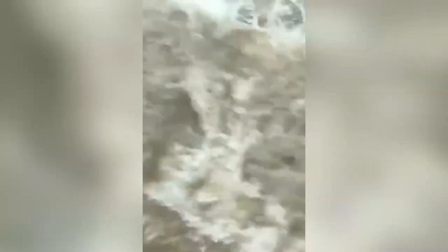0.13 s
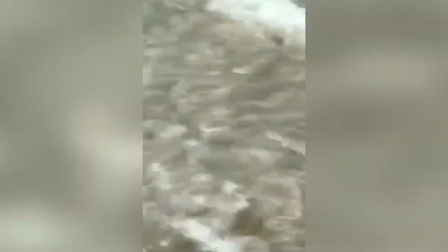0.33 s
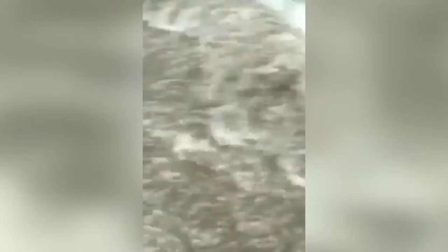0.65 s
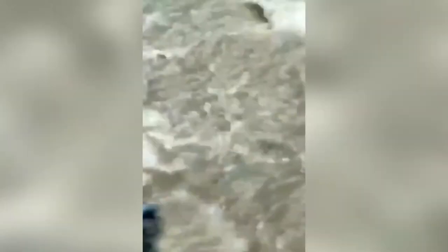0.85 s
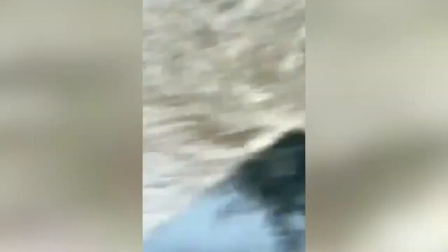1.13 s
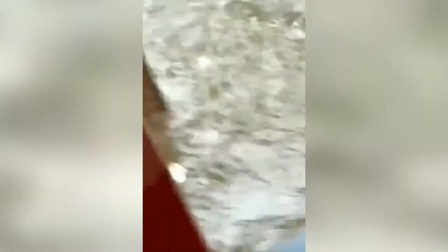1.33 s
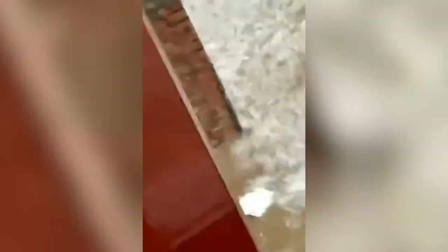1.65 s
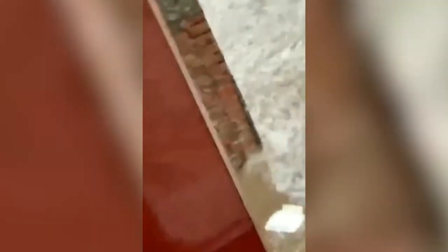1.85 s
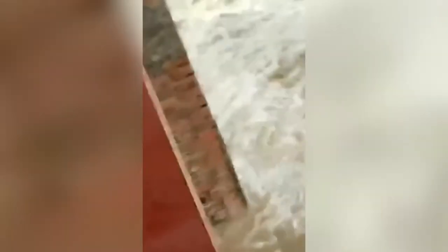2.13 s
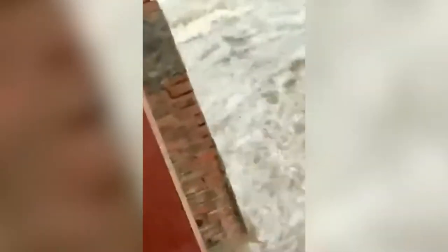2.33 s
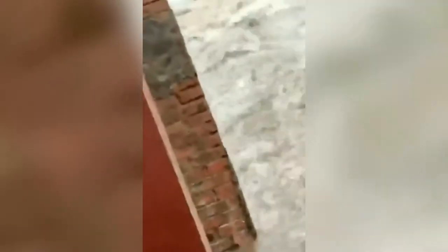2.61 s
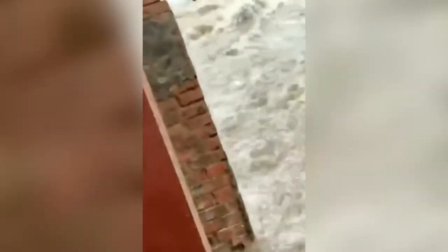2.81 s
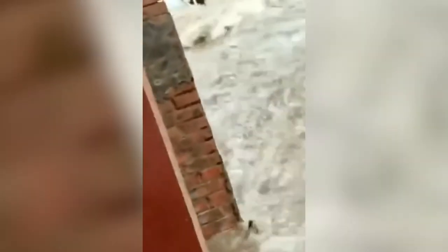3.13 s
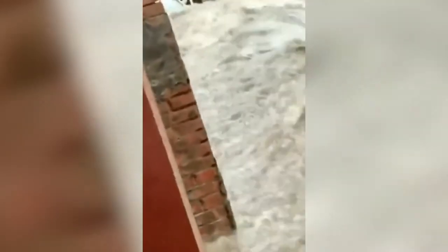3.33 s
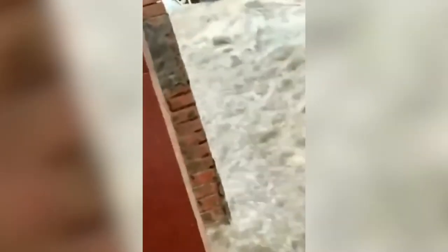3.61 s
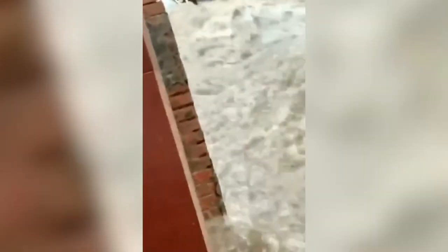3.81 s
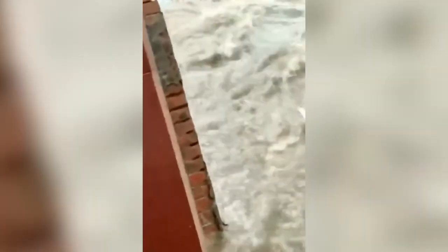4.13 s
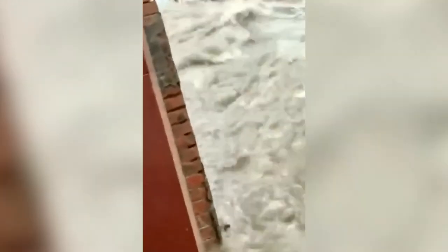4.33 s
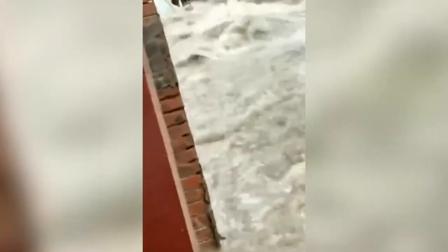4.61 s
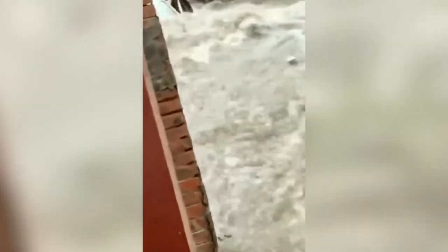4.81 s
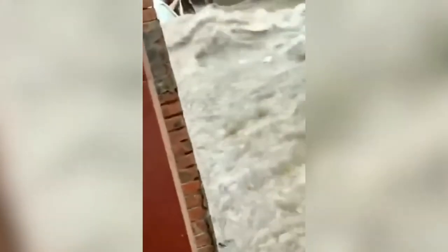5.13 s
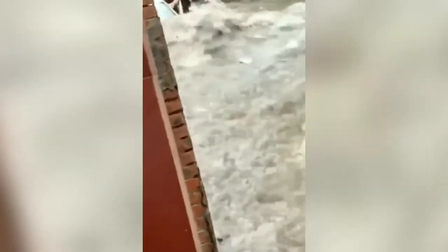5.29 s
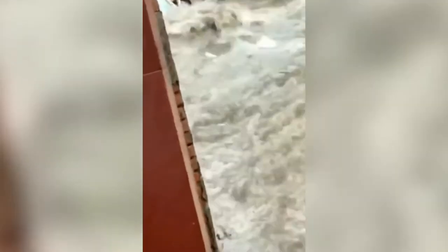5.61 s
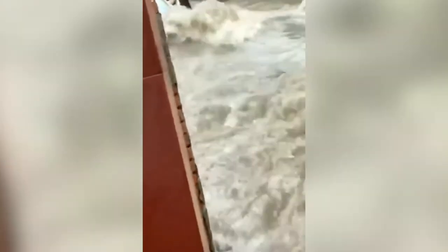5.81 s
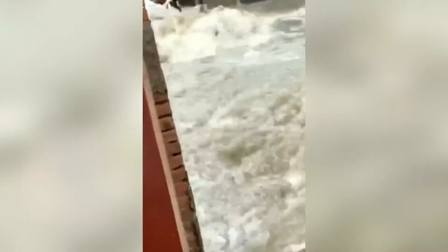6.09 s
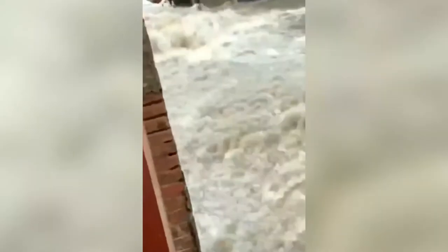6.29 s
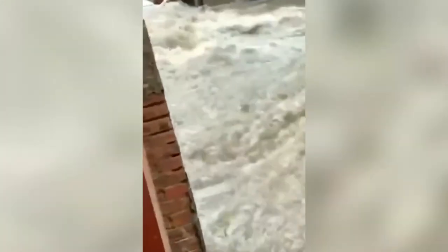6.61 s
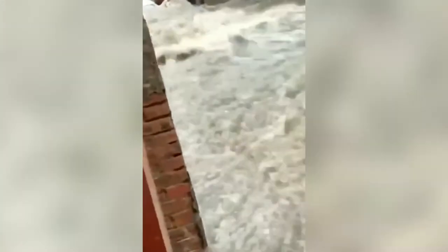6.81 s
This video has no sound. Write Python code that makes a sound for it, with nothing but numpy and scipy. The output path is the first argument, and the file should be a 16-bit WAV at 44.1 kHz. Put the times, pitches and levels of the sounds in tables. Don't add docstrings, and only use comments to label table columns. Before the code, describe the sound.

Floodwater roars loudly and steadily down a street, dense and bubbling, with dull slaps against a wall, overloading a small phone microphone.

```python
import sys
import numpy as np
from scipy import signal
from scipy.fft import rfft, irfft
from scipy.io import wavfile
from scipy.ndimage import uniform_filter1d, minimum_filter1d

SR = 44100
rng = np.random.default_rng(int(sys.argv[2]) if len(sys.argv) > 2 else 0)


def unload_audio(sound):
    columns = np.transpose(np.atleast_2d(sound))
    steps = np.round(np.clip(columns, -1, 1) * 32767)
    wavfile.write(sys.argv[1], SR, steps.astype(np.int16))


def how_loud(loudness_db):
    steps = np.asarray(loudness_db, float) / 20
    return 10 ** steps


N = 306495


def evened(x):
    return x / np.sqrt(np.mean(x ** 2) + 1e-20)


def colour(x, points):
    f, level_db = np.transpose(points)
    hz = np.fft.rfftfreq(len(x), 1 / SR)
    response = how_loud(np.interp(np.log(hz + 1), np.log(f + 1), level_db))
    return irfft(rfft(x) * response, len(x))


def surges(depth_db, surge_s=0.046):
    return depth_db * evened(uniform_filter1d(rng.standard_normal(N), round(surge_s * SR)))


def wash(patchy_db, flicker_db=0.6):
    real, imag, patches = rng.standard_normal((N // 128 + 6, 257, 3)).T
    patches = uniform_filter1d(patches, size=6, axis=0)
    patches = evened(uniform_filter1d(patches, size=20, axis=1))
    flicker = evened(uniform_filter1d(rng.standard_normal(real.shape[1]), size=8))
    z = (real + 1j * imag) * how_loud(patchy_db * patches + flicker_db * flicker)
    return evened(signal.istft(z, nperseg=512, noverlap=384)[1][:N])


def bubbles(lo_hz, hi_hz, per_s, cycles, spread_db, count=16):
    strength = how_loud(spread_db * np.minimum(rng.exponential(1, N), 5))
    births = strength * (rng.random(N) < per_s / SR)
    kind = rng.integers(0, count, N)
    out = np.zeros(N)
    for k, hz in enumerate(np.geomspace(lo_hz, hi_hz, count)):
        turns = np.arange(3000) * hz / SR
        envelope = (1 - np.exp(-turns)) * np.exp(-turns / cycles)
        tone = np.sin(2 * np.pi * turns * (1 + .01 * turns / cycles)) * envelope
        out += signal.oaconvolve(births * (kind == k), tone * hz)[:N]
    return evened(out)


# t/s, peak level/dB, f/Hz
SLAPS = [(0.268, -45, 122), (0.389, -43.5, 138), (0.526, -51, 134), (0.78, -48.5, 135), (0.99, -47.5, 136),
         (1.862, -43, 94), (1.987, -48.5, 103), (2.38, -39, 120), (2.672, -43, 120.3), (3.024, -44, 113),
         (3.233, -38, 111.3), (3.441, -46, 115), (3.624, -45, 101.5), (4.105, -45, 121),
         (4.214, -47.5, 152), (4.297, -46, 124), (4.936, -48.5, 112), (5.003, -47, 133),
         (5.148, -45.5, 135), (5.711, -49.5, 133), (5.78, -41.5, 113), (6.192, -47.5, 146),
         (6.52, -52, 102), (6.731, -48, 107)]


def slaps(cycles=0.22, crack_s=0.003):
    push, crack = np.zeros(N), np.zeros(N)
    t = np.arange(-1500, 1500) / SR
    for s, db, hz in SLAPS:
        centre = round(s * SR)
        at = slice(centre - 1500, centre + 1500)
        push[at] += how_loud(db) * np.cos(2 * np.pi * hz * t) * np.exp(-(hz * t / cycles) ** 2)
        crack[at] += how_loud(1.5 * (db + 40) - 23) * np.exp(-(t / crack_s) ** 2)
    # f/Hz, level/dB
    crack_band = [(2400, -41.5), (2900, -1.5), (4200, -7.5), (5500, -7.5), (6500, -38)]
    return push + colour(crack * rng.standard_normal(N), crack_band)


# t/s, length/s, peak level/dB, f/Hz
GULPS = [
    (5.35, 0.17, -17, 1048),
    (5.948, 0.04, -10.5, 1983),
]


def gulps(rise=0.025):
    out = np.zeros(N)
    for s, length, db, hz in GULPS:
        t = np.arange(round(length * SR)) / SR
        phase = 2 * np.pi * hz * t * (1 + rise * (t / length - 1) / 2)
        out[round(s * SR):][:len(t)] += how_loud(db) * np.sin(phase) * np.sin(np.pi * t / length)
    return out


# t/s, churn level/dB, splash level/dB relative to the churn
FLOW = [(0.0, -11, 2.5), (0.2, -12, -0.5), (0.339, -11, -3.5), (0.385, -19.5, 1.5), (0.44, -10.5, -7),
        (0.8, -11.5, -4), (1.3, -11.5, -0.5), (1.9, -12, 0.5), (2.5, -11.5, 0.5), (3.0, -12, 0),
        (3.5, -12, 0), (4.2, -11.5, -1.5), (4.7, -12, 1), (5.3, -12.5, 2.5), (5.75, -11.5, -4),
        (6.2, -12.5, 0.5), (6.6, -12, -1.5), (6.95, -13, 1.5)]
# f/Hz, level/dB per Hz
ROAR = [(30, -54.5), (212, -24), (346, -23), (563, -13), (847, -14), (1020, -6), (1200, -2.5), (1380, -2),
        (1790, -11.5), (1950, -4.5), (2300, 0), (2650, -8.5), (3050, -28.5), (3800, -50)]
# f/Hz, level/dB per Hz
SPRAY = [(2600, -47.5), (3100, -30.5), (3450, -30.5), (3800, -39.5), (4300, -32), (4900, -22),
         (5300, -24.5), (5600, -29), (6000, -20.5), (6500, -19), (7000, -23), (7500, -33.5), (7900, -43.5),
         (8100, -63.5)]


def torrent(spray_follows=0.65):
    s, *columns = np.transpose(FLOW)
    t = np.arange(N) / SR
    swell_db, splash_db = (np.interp(t, s, db - db.mean()) for db in columns)
    swell_db = swell_db + surges(0.67)
    swell, splash = how_loud(swell_db), how_loud(splash_db + surges(1.5))
    mist = how_loud((spray_follows - 1) * swell_db)

    froth = how_loud(-13) * bubbles(499.2, 3012, per_s=2500, cycles=3.54, spread_db=1.74)
    gurgles = how_loud(-17.5) * bubbles(597.6, 2800, per_s=120, cycles=25.0, spread_db=2.14)
    churn = colour(wash(patchy_db=0.35) + froth + gurgles, ROAR)
    upper = colour(churn, [(1700, -64), (1850, -13.5), (2700, -5.5), (3000, -36)])

    fizz = how_loud(-15) * bubbles(3000, 8000, per_s=6100, cycles=1.7, spread_db=1.9)
    spray = colour(wash(patchy_db=1.2) + fizz, SPRAY)
    return how_loud(2.0) * swell * (churn + (splash - 1) * upper + mist * spray)


def scene():
    return (torrent() + how_loud(8.0) * slaps() + gulps())[None]


# t/s, length/s, level/dB near 4.8 kHz once open
OPENINGS = [(0.043, 0.046, -25), (0.235, 0.24, -27.5), (0.462, 0.218, -26.5), (0.698, 0.16, -26.5),
            (0.906, 0.057, -28.5), (1.012, 0.04, -26.5), (1.09, 0.066, -27), (1.189, 0.087, -28),
            (1.336, 0.05, -27.5), (1.419, 0.043, -26), (1.819, 0.092, -27.5), (2.281, 0.05, -29.5),
            (2.646, 0.044, -27.5), (3.411, 0.036, -25), (3.597, 0.051, -26), (3.777, 0.112, -27),
            (4.088, 0.05, -28.5), (4.167, 0.147, -26), (4.376, 0.107, -26), (4.527, 0.047, -27),
            (4.813, 0.23, -27.5), (5.106, 0.135, -27.5), (5.48, 0.062, -27.5), (5.572, 0.076, -27),
            (5.678, 0.077, -27.5), (5.853, 0.085, -27.5), (6.02, 0.062, -33.5), (6.314, 0.12, -26.5),
            (6.492, 0.057, -28), (6.664, 0.205, -28)]
# t/s, level/dB near 4.8 kHz at the end
PEEKS = [(0.121, -31), (0.188, -25), (1.489, -33), (1.568, -29.5), (1.756, -27), (1.975, -28.5),
         (2.12, -33), (2.2, -31), (2.367, -29), (2.45, -30.5), (2.83, -32), (2.908, -30.5), (2.958, -29.5),
         (3.178, -26.5), (3.215, -33), (3.351, -33), (3.707, -30.5), (3.911, -28), (3.95, -31.5),
         (4.749, -26.5), (5.31, -30.5), (5.415, -30), (5.784, -28), (5.956, -26.5), (6.095, -27.5),
         (6.165, -24.5), (6.253, -26), (6.6, -27), (6.889, -31.5)]


def openness(peek_s=.035, start_below_db=5.5, rise_s=.025, snap_s=.003, lately_s=.025):
    shut_db, wide_db = -37, -27
    aim_db = np.full(N, shut_db)
    for s, length, open_db in OPENINGS + [(s, peek_s, db) for s, db in PEEKS]:
        part = aim_db[round(s * SR):round((s + length) * SR)]
        rise = np.arange(len(part)) / SR / min(rise_s, length)
        part[:] = open_db - start_below_db * np.maximum(1 - rise, 0)
    share = (how_loud(aim_db) - how_loud(shut_db)) / (how_loud(wide_db) - how_loud(shut_db))
    share = np.maximum(share, 0)
    return uniform_filter1d(share, 2 * round(snap_s * SR)), uniform_filter1d(share, round(lately_s * SR))


# f/Hz, level/dB
OPEN = [(60, 7.5), (300, 0), (1400, -1.5), (2000, 0.5), (2500, 4), (3050, 6.5), (3700, 5.5), (4600, 9.5),
        (5200, 6.5), (5900, 2), (6500, -2), (7100, 1), (7900, 4.5)]


def noise_filter(x):
    share, lately = openness()
    filtered = x + share * (colour(x, OPEN) - x)
    return filtered * how_loud(-4 * np.maximum(lately - share, 0))


def gain_control(x, span_s=0.083, share=0.51):
    power = uniform_filter1d(x ** 2, round(span_s * SR)) + 1e-9
    return x * (power / power.mean()) ** (-share / 2)


def limit(x, hold_s=.0014, ceiling=1.0, knee=1.6):
    width = round(hold_s * SR)
    gain = minimum_filter1d(np.minimum(1, ceiling / (abs(x) + 1e-9)), width)
    x = x * uniform_filter1d(gain, width)
    return knee * np.tanh(x / knee)


def mirror_band(x, phone_rate=16000):
    mirror = x * 2 * np.cos(2 * np.pi * phone_rate * np.arange(N) / SR)
    # f/Hz, level/dB
    leak = [(7900, -91.5), (8030, -12), (8200, -5), (8400, -12), (8800, -26.5),
            (9050, -37.5), (9300, -64), (12000, -120)]
    return how_loud(surges(1.8)) * colour(mirror, leak)


def starve(x, floor_db=-84):
    z = signal.stft(x, nperseg=1024)[2]
    power = uniform_filter1d(abs(z) ** 2, size=5, axis=0)
    power = uniform_filter1d(power, size=3, axis=1)
    kept = np.clip(power / how_loud(floor_db) ** 2 - 1, 0, 1)
    kept[:100] = 1
    return signal.istft(z * kept, nperseg=1024)[1][:N]


def roll_off(x):
    return signal.sosfilt(signal.butter(12, 9200, fs=SR, output="sos"), x)


def record(dry):
    # f/Hz, level/dB
    edge = [(20, -18.0), (45, -8), (100, -2.5), (7700, -1.5), (7980, -6), (8100, -68.5)]
    limited = colour(limit(gain_control(noise_filter(dry[0]))), edge)
    mix = starve(limited + mirror_band(limited))[None]
    return roll_off(mix)


dry = scene()
out = record(dry)
unload_audio(out)
```